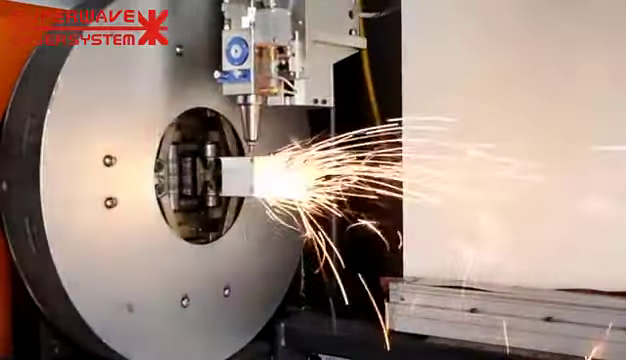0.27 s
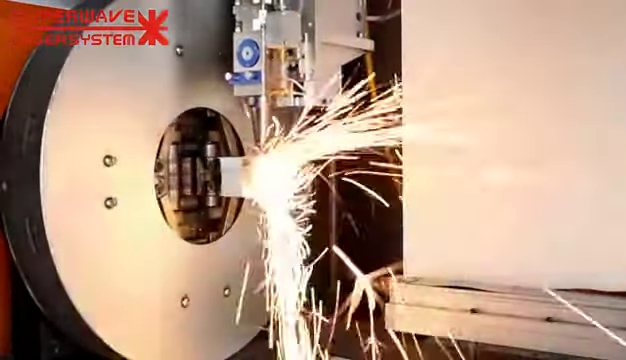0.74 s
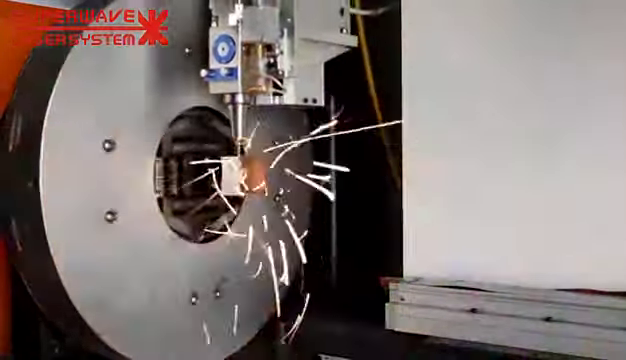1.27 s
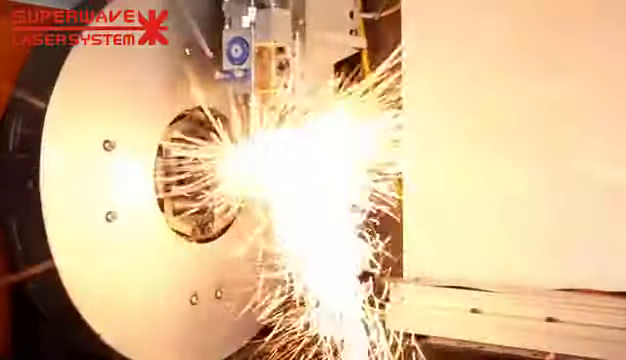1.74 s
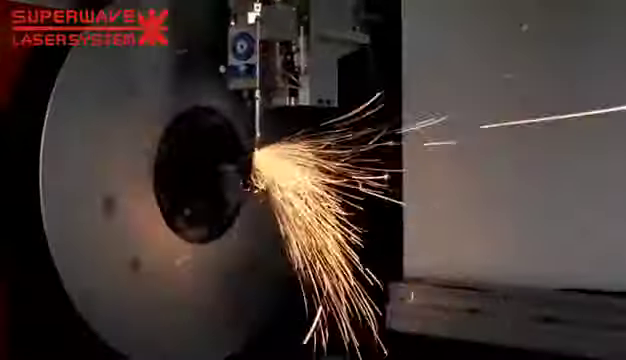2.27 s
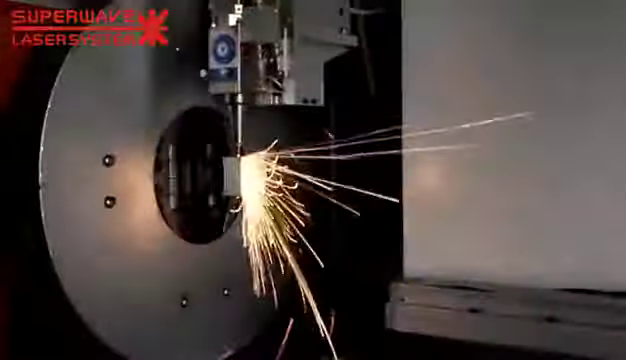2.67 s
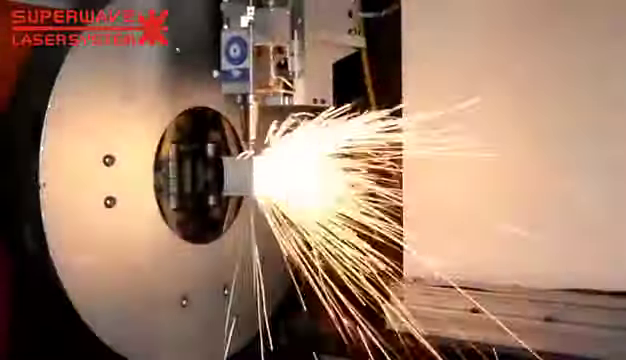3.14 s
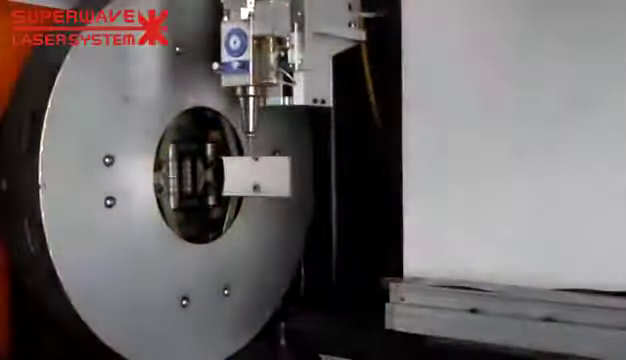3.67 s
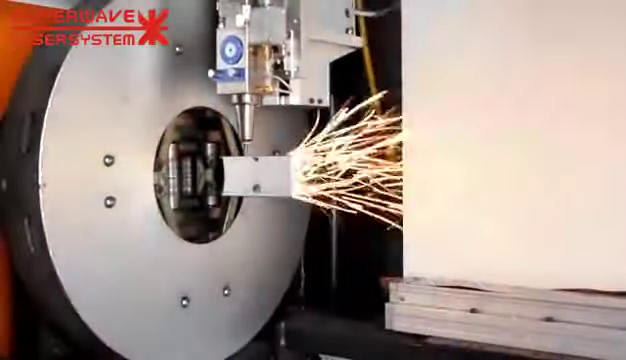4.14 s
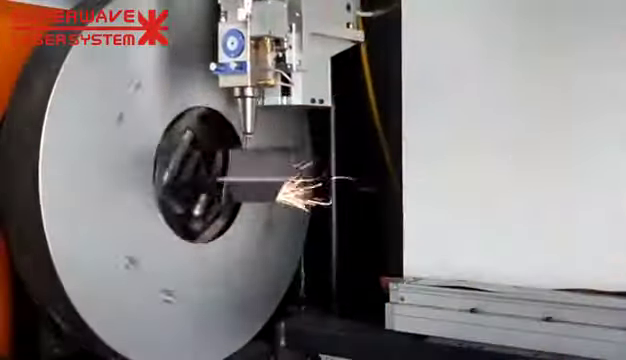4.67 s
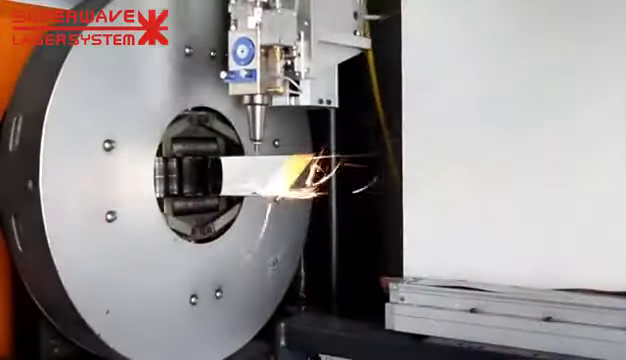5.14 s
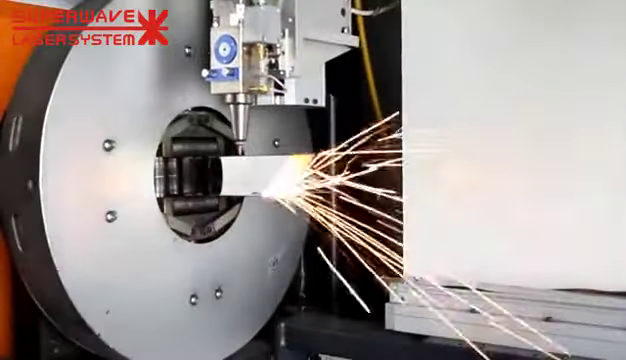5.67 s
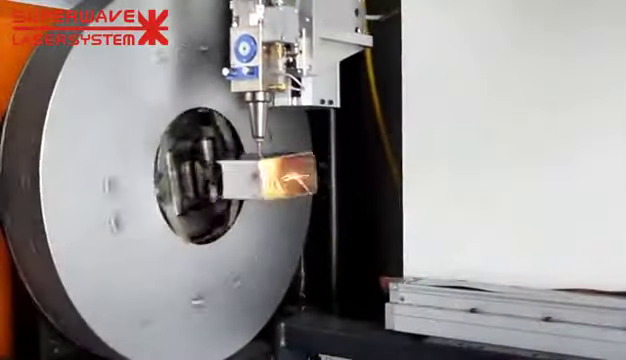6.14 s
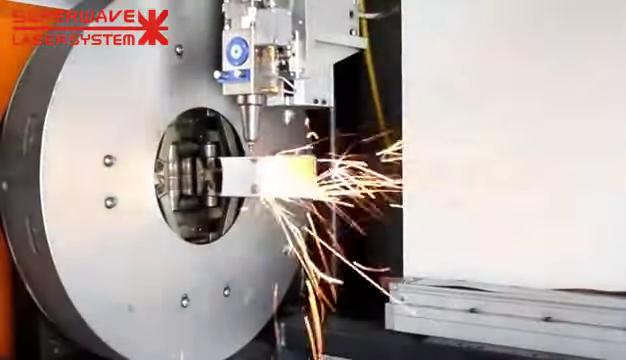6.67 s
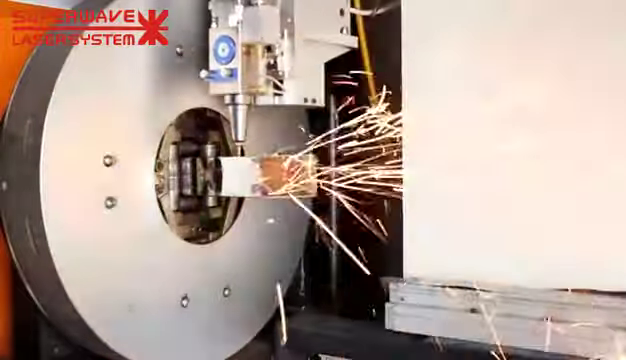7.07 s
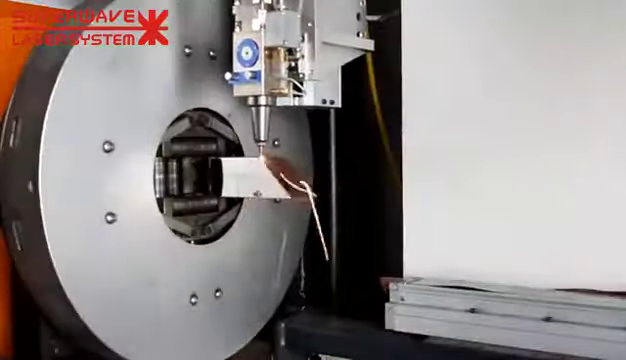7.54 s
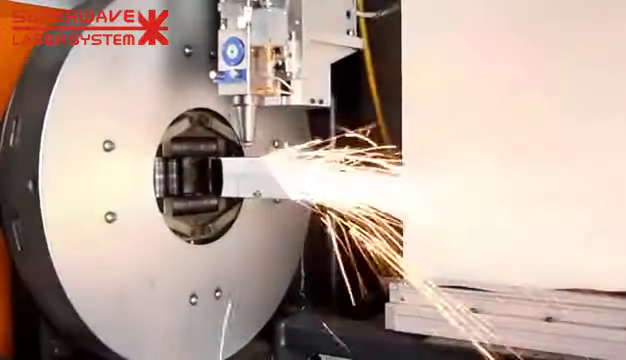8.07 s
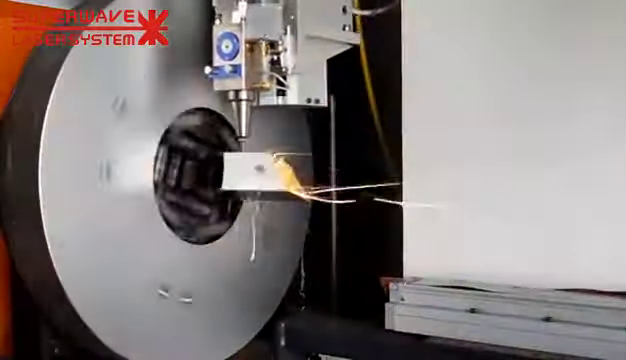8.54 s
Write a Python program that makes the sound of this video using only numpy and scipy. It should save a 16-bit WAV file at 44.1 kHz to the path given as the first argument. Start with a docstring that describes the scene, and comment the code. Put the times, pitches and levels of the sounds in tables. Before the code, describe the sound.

Close mono pickup of tube cutting in a workshop: dense bright gas jet noise, a hollow breathy resonance from the tube and faint fan hum. A high electronic-sounding whine wavers and spikes. After about three seconds an offcut falls, clanks twice and rings like a small metal bar; later it taps and rings once more. Then only uneven hiss, brief airy whistles and whine flares remain, without stopping.

```python
"""Gas hisses and sputters as a laser cuts a square steel tube in a workshop; one small microphone, mono. Gas:
coloured noise for jet, tube hollow and tube mouth, plus a fluttering air-column tone. Brief whistles sound now
and then. Beam: an unsteady whine that flares. Background: rumble noise and fan tones. An offcut drops and
bounces (noise cracks, sine thuds), then rings as decaying partials while it tumbles."""
import sys
import numpy as np
from scipy import signal
from scipy.io import wavfile
from scipy.ndimage import uniform_filter1d, map_coordinates

SR = 44100
rng = np.random.default_rng(int(sys.argv[2]) if len(sys.argv) > 2 else 0)


def file_out(sig):
    """Save sig as 16-bit WAV at sys.argv[1]."""
    # one column per channel
    cols = np.atleast_2d(sig).T
    # limit, then scale
    lim = np.clip(cols, -1, 1)
    pcm = np.round(lim * 32767).astype(np.int16)
    wavfile.write(sys.argv[1], SR, pcm)


N = 387621


def undb(db):
    """Level in dB to linear gain."""
    return 10 ** (np.asarray(db) / 20)


def curve(table):
    """Columns of a (t/s, value, ..) table, interpolated to every sample."""
    t_s, *columns = np.transpose(table)
    return [np.interp(np.arange(N) / SR, t_s, column) for column in columns]


def walk(rate_hz):
    """Random levels, each held 1 / rate_hz, smoothed by two moving averages; spread near 1."""
    hold = int(SR / rate_hz)
    steps = np.repeat(rng.standard_normal(N // hold + 1), hold)
    return 1.282 * uniform_filter1d(uniform_filter1d(steps, hold), hold)[:N]


def sine(hz):
    """Sine of rms 1 with random start phase; hz may vary per sample."""
    cycles = np.cumsum(hz * np.ones(N)) / SR
    return np.sqrt(2) * np.sin(2 * np.pi * (cycles + rng.random()))


def bell(t_s, length_s):
    """Gaussian swell, 1 at t_s, length_s wide at half height."""
    return 0.5 ** ((2 * (np.arange(N) / SR - t_s) / length_s) ** 2)


def swells(table):
    """Summed gain of (t/s, length/s, level/dB) swells."""
    return sum(undb(db) * bell(t_s, length_s) for t_s, length_s, db in table)


def patches(hz, t_s, width_hz, rate_hz):
    """Random field over pitch and time, one value per width_hz and 1 / rate_hz, joined linearly."""
    grid = rng.standard_normal((400, 400))
    points = np.meshgrid(hz / width_hz, t_s * rate_hz, indexing="ij")
    return map_coordinates(grid, points, order=1, mode="wrap")


def hiss(shape, lo_hz, hi_hz, patch_db, patch_hz, grain_db, grain_hz):
    """Coloured noise, rms 1 from lo_hz to hi_hz before wide patches and narrow grains flicker."""
    stft = dict(nperseg=2048, noverlap=1536)
    f, t_s, cells = signal.stft(rng.standard_normal(N), SR, **stft)
    hz, db = np.transpose(shape)
    colour = undb(np.interp(np.log(f + 1), np.log(hz), db, left=-90, right=-90))
    band = (f > lo_hz) & (f < hi_hz)
    colour = colour / np.sqrt(np.sum(colour[band] ** 2) / len(f))
    flicker_db = patch_db * patches(f, t_s, patch_hz, 12.5)
    flicker_db = flicker_db + grain_db * patches(f, t_s, grain_hz, 9.5)
    return signal.istft(cells * colour[:, None] * undb(flicker_db), SR, **stft)[1][:N]


# rumble spectrum: f/Hz, relative density/dB
SHOP_SPECTRUM = [(25, -35), (50, -21), (100, -15.5), (260, -8), (343, -0.5), (390, -3.5), (600, -3.5),
                 (910, -4.5), (1300, -11), (2000, -30.5)]
# fan tones: f/Hz, width/Hz (sets waver rate and pitch wander), mean level/dB
FAN_TONES = [(478, 14, -55.5), (1190, 12, -53), (3060, 30, -48)]


def workshop(level_db):
    """Extractor rumble plus fan tones unsteady in level and pitch."""
    rumble = undb(level_db) * hiss(SHOP_SPECTRUM, 250, 1000, 1.5, 200, 2.43, 59.9)
    tones = np.zeros(N)
    for hz, width_hz, db in FAN_TONES:
        gain = undb(db + 1.9 * walk(width_hz))
        tones += gain * sine(hz + 0.301 * width_hz * walk(width_hz))
    return rumble + tones


# whine flares, strongest twice per turn of the tube: t/s, length/s, level/dB
BEAM_FLARES = [(.44, .08, -39), (.57, 0.054, -40), (.72, .15, -47), (1.0, .08, -41), (1.22, 0.19, -44.5),
               (1.57, 0.045, -43), (2.55, 0.066, -35.5), (2.9, 0.091, -42), (4.09, 0.048, -40),
               (4.46, .07, -33), (4.93, .1, -42), (5.78, 0.071, -34), (6.02, 0.17, -38.5),
               (7.1, 0.04, -33.5), (7.34, .1, -41.5), (8.42, 0.086, -34.5), (8.65, 0.13, -37)]
BEAM_HZ, BEAM_DB, BEAM_WAVER_DB = 5000.5, -48.5, 1
BEAM_OFF_S, BEAM_ON_S, BEAM_RAMP_S = 4, 4.05, .05


def beam():
    """Melt whines at the beam's pulse rate, slightly unsteady; the steady part pauses once."""
    t = np.arange(N) / SR
    on = np.clip(np.maximum(BEAM_OFF_S - t, t - BEAM_ON_S) / BEAM_RAMP_S, 0, 1)
    steady = on * undb(BEAM_DB + BEAM_WAVER_DB * walk(12))
    flares = swells(BEAM_FLARES) * undb(1.5 * walk(40))
    return (steady + flares) * sine(BEAM_HZ + 2.5 * walk(25))


# offcut contacts: t/s, crack drive level/dB, crack centre f/Hz, crack t60/s,
# thud level/dB, thud f/Hz, thud t60/s
OFFCUT_BOUNCES = [(3.473, -15, 2800, 0.053, -42, 300, .1), (3.496, -25, 3500, 0.025, -44, 310, .1),
                  (3.552, -30, 1500, .03, -29, 470, 0.11), (3.765, -33, 1500, 0.068, -32, 500, .1),
                  (3.772, -9, 3200, .018, -30.5, 125, 0.08), (3.783, -19, 2800, 0.05, -34, 327, 0.13),
                  (3.822, -23, 3500, 0.017, -47, 312, 0.3), (3.846, -20, 3000, 0.018, -30, 322, 0.38),
                  (4.628, -32, 3000, 0.039, -48, 302, 0.11), (4.636, -18, 4000, 0.027, -49, 304, 0.095),
                  (4.736, -23, 3000, 0.035, -53, 300, .1)]


def bounces():
    """Each landing: a short broad crack (decaying band noise) and a softer bin thud (decaying sine)."""
    out, t = np.zeros(N), np.arange(SR // 2) / SR
    for t_s, crack_db, crack_hz, crack_t60_s, thud_db, thud_hz, thud_t60_s in OFFCUT_BOUNCES:
        band = signal.butter(1, [crack_hz / 1.36, crack_hz * 1.3], "bandpass", fs=SR, output="sos")
        noise = 3 * signal.sosfilt(band, rng.standard_normal(len(t)))
        crack = noise * undb(crack_db - 60 * t / crack_t60_s) * np.minimum(t / 0.00083, 1)
        thud = undb(thud_db - 60 * t / thud_t60_s) * np.sin(2 * np.pi * thud_hz * t)
        i = int(t_s * SR)
        out[i:i + len(t)] += crack + thud * np.minimum(t / 0.0039, 1)
    return out


# free ringing between contacts: struck t/s, damped t/s
RING_FLIGHTS = [(3.48, 3.768), (3.77, 3.91), (4.625, 4.722), (4.727, 5.13)]
# per mode, per flight (None = silent): swell t/s, level there/dB, swell spacing/s, dip depth/dB
RING_SWELLS = [
    [(3.72, -25.5, .44, 20), (3.868, -33, .2, 20), None, None],
    [(3.66, -39, .11, 12), None, None, (4.81, -37, .1, 14)],
    [(3.65, -36, .3, 12), (3.79, -29, .4, 8), None, None],
    [(3.65, -32, .36, 12), None, None, None],
    [(3.62, -34, .5, 12), (3.85, -31, .3, 4), (4.69, -37, .12, 14), (5.0, -36, .55, 24)],
    [(3.48, -34, .3, 14), (3.83, -36, .5, 3), None, None],
    [(3.65, -35, .3, 8), None, None, (4.98, -39, .5, 20)],
    [(3.505, -22, .11, 6), (3.825, -24, .14, 12), None, (4.755, -22, .7, 260)],
    [None, None, (4.642, -20.5, .16, 18), (5.04, -32.5, .5, 16)],
    [(3.5, -21, .065, 16), (3.775, -29, .3, 6), None, None],
    [(3.615, -23.5, .095, 8), (3.78, -33, .1, 6), None, None],
    [None, (3.782, -33, .07, 10), None, None],
    [None, (3.78, -31, .065, 5), (4.674, -33, .1, 12), (4.79, -33, .5, 30)],
    [(3.575, -27, .115, 13), None, None, None],
    [None, (3.79, -22.5, .062, 16), (4.68, -27, .2, 14), None],
    [(3.575, -35, .11, 13), (3.77, -38, .3, 6), (4.71, -36, .3, 6), (4.8, -36, .1, 14)],
    [(3.506, -28, .15, 20), (3.795, -29, .3, 8), None, None],
    [(3.54, -43, .2, 16), None, None, None],
]
# per mode: f/Hz
RING_MODES_HZ = [1219, 2183, 2405, 2449, 2488, 2522, 2693, 2845, 2864, 2915, 3610, 3570, 3720, 5183, 5166,
                 5430, 5940, 7150]
# per mode: decay t60/s
RING_DECAYS_S = [9, 1.5, 1.5, 2, 2, 1, 2, 1.4, 5, .4, 9, 1, 1, 1.1, 1.5, 1.2, 1.8, 2]
# per mode: rise time after the blow/s, longer for modes first heard late
RING_RISES_S = [.003, .003, .003, .003, .003, .003, .003, .02, .008, .02, .13, .003, .003, .06, .012, .003,
                .02, .003]


def offcut_ring():
    """Near-pure partials: struck, dying away, swelling as the turning piece faces the microphone."""
    out = np.zeros(N)
    for hz, t60_s, rise_s, flights in zip(RING_MODES_HZ, RING_DECAYS_S, RING_RISES_S, RING_SWELLS):
        partial = undb(1.6 * walk(70)) * sine(hz + 3.2 * walk(30))
        for (struck_s, damped_s), swell in zip(RING_FLIGHTS, flights):
            if swell:
                first_s, db, spacing_s, depth_db = swell
                i = np.arange(int(struck_s * SR), int(damped_s * SR))
                t = i / SR
                fade = np.clip(np.minimum((t - struck_s) / rise_s, (damped_s - t) / .012), 0, 1)
                turn = np.sin(np.pi * (t - first_s) / spacing_s) ** 2
                level_db = db - 60 * (t - first_s) / t60_s - depth_db * turn
                out[i] += fade * undb(level_db) * partial[i]
    return out


# brief whistling tones, the first at the offcut's lowest ring pitch as the piece comes loose: t/s, length/s,
# level/dB, f/Hz
BRIEF_WHISTLES = [(3.39, 0.14, -39, 1219), (6.072, .13, -39, 2640), (6.23, 0.067, -35.5, 2270)]


def whistles():
    """Short tones of unsteady pitch within the hiss."""
    out = np.zeros(N)
    for t_s, length_s, db, hz in BRIEF_WHISTLES:
        out += undb(db) * bell(t_s, length_s) * sine(hz + 6.3 * walk(40))
    return out


# tube air column singing out: t/s, length/s, level/dB before flutter, f/Hz
COLUMN_SINGS = [(.9, 0.18, -46, 1515), (1.25, 0.074, -44, 1510), (1.604, .12, -41, 1500),
                (2.08, 0.1, -45.5, 1550), (2.467, .15, -43.5, 1590), (3.371, 0.13, -35, 1540),
                (4.36, 0.23, -41, 1505), (4.85, .12, -40.5, 1610), (5.25, 0.11, -42.5, 1600),
                (6.11, 0.14, -42.5, 1560), (6.266, 0.066, -36, 1590), (6.492, 0.16, -42, 1560),
                (7.053, .12, -45, 1580), (7.4, 0.097, -41, 1570), (7.569, 0.11, -36, 1585),
                (7.852, .15, -41.5, 1640)]
COLUMN_DB, COLUMN_WAVER_DB, COLUMN_FLUTTER_HZ = -54.5, 3.5, 210


def air_column():
    """Air column of the tube: two sines under random flutter, with a weak floor and swells."""
    hz = curve([(row[0], row[3]) for row in COLUMN_SINGS])[0]
    floor = undb(COLUMN_DB + COLUMN_WAVER_DB * walk(12))
    sings = undb(1.9 * walk(35)) * swells(row[:3] for row in COLUMN_SINGS)
    tone = walk(COLUMN_FLUTTER_HZ) * sine(hz) + walk(COLUMN_FLUTTER_HZ) * sine(hz)
    return (floor + sings) * tone / np.sqrt(2)


# gas noise spectra, each: f/Hz, relative density/dB
JET_SPECTRUM = [(1200, -23), (2200, -11), (3900, 0.5), (5000, -0.5), (6250, 0.5), (7000, 1), (7600, -0.5),
                (8500, -1)]
HOLLOW_SPECTRUM = [(1900, -16.5), (2500, -7), (3100, -3.5), (3500, -5.5), (3900, -14.5), (4500, -27)]
MOUTH_SPECTRUM = [(700, -22), (1100, -3), (1520, 0), (1870, -1), (2300, 0.5), (2800, -9.5), (3600, -32.5)]


def gas(jet_db, hollow_db, mouth_db):
    """Turbulent jet, its ring in the tube and blow over the mouth; the kerf sputters on all."""
    jet = undb(jet_db) * hiss(JET_SPECTRUM, 5976, 7710, 1.1, 581, 3.35, 65)
    hollow = undb(hollow_db) * hiss(HOLLOW_SPECTRUM, 2515, 3746, 0.92, 300, 3.1, 60.3)
    mouth = undb(mouth_db) * hiss(MOUTH_SPECTRUM, 1156, 2296, 1.5, 298, 2.6, 60.5)
    sputter = undb(0.59 * walk(45) + 0.81 * walk(150))
    return sputter * (jet + hollow + mouth + air_column())


# base levels: t/s, jet level/dB, tube hollow level/dB, tube mouth level/dB, workshop level/dB
CUT_LEVELS = [(0.0, -34.5, -33.5, -38, -43), (0.34, -29, -33, -43.5, -44), (0.56, -32, -35.5, -38, -43),
              (0.85, -31, -35.5, -39, -39.5), (1.15, -34.5, -37, -38.5, -40.5), (1.4, -33, -40, -42, -41),
              (1.7, -30.5, -32.5, -38.5, -41.5), (2.15, -32, -37, -36.5, -40),
              (2.5, -31.5, -33.5, -36, -41.5), (2.7, -34.5, -40, -40.5, -43), (3.1, -32, -35, -43.5, -46),
              (3.27, -28.5, -30, -46, -45), (3.33, -33, -32, -35, -39), (3.47, -34, -28, -32, -43.5),
              (3.55, -30.5, -31, -35, -39), (3.75, -33.5, -29.5, -37, -38),
              (3.92, -29.5, -30.5, -36.5, -39.5), (4.2, -30.5, -34.5, -39.5, -44),
              (4.45, -33, -38, -38, -38.5), (4.85, -33, -32, -35.5, -43), (5.2, -31.5, -34, -38.5, -39.5),
              (5.42, -31.5, -31, -44.5, -46.5), (5.75, -32.5, -40, -39, -41),
              (6.1, -31.5, -35, -33.5, -44.5), (6.4, -32, -33.5, -37, -40),
              (6.75, -31.5, -32.5, -39.5, -44.5), (7.25, -34.5, -39.5, -36, -40.5),
              (7.4, -33, -34.5, -34.5, -41), (7.85, -32, -31, -37.5, -41), (8.2, -31, -31.5, -35.5, -43),
              (8.45, -33.5, -33, -35.5, -40), (8.79, -32, -35, -36, -45.5)]
# brief dips and surges: t/s, length/s, jet change/dB, hollow change/dB, mouth and workshop change/dB
LEVEL_DIPS = [(.34, 0.054, 0, 2.5, 2.5), (1.37, 0.054, -2.5, -1, -1.5), (1.461, 0.031, 3.5, 0, 5),
              (1.5, .04, -3.5, 2, -2), (2.346, 0.045, -6, -0.5, -3), (2.408, .04, -1, -2, -0.5),
              (2.7, .05, 2.5, -2, 1), (2.8, 0.11, 4, 3, 5), (2.84, 0.052, -5.5, 0, -2),
              (3.515, .06, -5, -9, -3), (3.59, .05, -2, 1, 0.5), (3.638, 0.072, -10, -3, -1.5),
              (3.72, .05, 1.5, -1, -2.5), (3.77, 0.022, 4.5, 4, 7.5), (3.815, 0.049, -12, -3, -6),
              (4.28, 0.015, -1, 4.5, 2), (4.356, 0.055, 0, -3, 1), (4.62, 0.044, 2.5, 2.5, 0),
              (4.664, 0.057, -6.5, 1, -11), (4.75, 0.058, -6, -1.5, -7.5), (5.402, 0.075, 3.5, -4, 5.5),
              (5.723, .06, -3.5, -2, 1.5), (5.762, .04, 1, 6.5, 0), (5.824, 0.029, -1, -1, -3),
              (6.06, 0.073, -1, 1.5, 0.5), (6.192, 0.13, -3.5, -1, -4), (6.29, 0.063, 1, 0, 3.5),
              (6.66, .04, 2, 1, 0.5), (6.707, 0.044, -1, -6, -3), (7.216, 0.03, 0, 0, -8),
              (7.252, 0.027, 3.5, -6, 0), (7.299, 0.064, 0, -5, -4.5), (7.34, 0.043, 1, -3, 2.5),
              (7.377, 0.026, -5, 2, 0.5), (7.498, 0.052, -2.5, -4, -4.5), (7.55, 0.04, 1, 5, 1),
              (7.836, 0.033, 3, -2, 4.5), (7.906, 0.034, -1.5, -1, -2.5), (7.943, .03, 3, 2, 1.5),
              (7.98, 0.059, 2.5, 0.5, -3), (8.103, 0.044, -2, 1.5, -6.5), (8.16, 0.041, 0, 1, 1.5),
              (8.304, .04, -1.5, 2, 1), (8.417, 0.052, -2, -6, -1)]
# random waver: jet/dB, hollow/dB, mouth/dB, workshop/dB
LEVEL_WAVER_DB = (0.85, 1.1, 1.7, 1.39)
LEVEL_WAVER_HZ = 30


def noise_levels():
    """Levels in dB of jet, hollow, mouth and workshop: base + dips and surges + waver."""
    jet, hollow, low = sum(np.outer(db, bell(t_s, length_s)) for t_s, length_s, *db in LEVEL_DIPS)
    changes_db = (jet, hollow, low, low)
    return [base_db + change_db + waver_db * walk(LEVEL_WAVER_HZ)
            for base_db, change_db, waver_db in zip(curve(CUT_LEVELS), changes_db, LEVEL_WAVER_DB)]


def scene():
    """Sum of all sources, the same on both channels."""
    jet_db, hollow_db, mouth_db, shop_db = noise_levels()
    background = workshop(shop_db) + beam()
    offcut = bounces() + offcut_ring()
    mono = background + offcut + whistles() + gas(jet_db, hollow_db, mouth_db)
    return np.array([mono, mono])


TOP_HZ = 7575


def record(dry):
    """The recorder cuts the top steeply: elliptic low-pass, 0.2 dB ripple, 75 dB stopband."""
    sos = signal.ellip(13, .2, 75, TOP_HZ, fs=SR, output="sos")
    return signal.sosfilt(sos, dry)


dry = scene()
out = record(dry)
file_out(out)
```